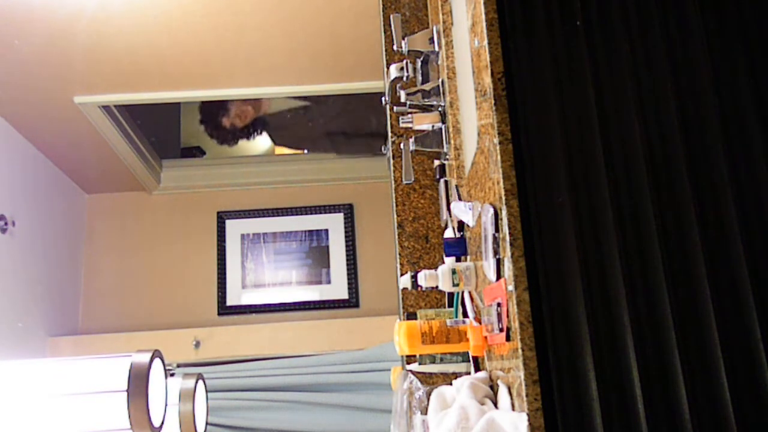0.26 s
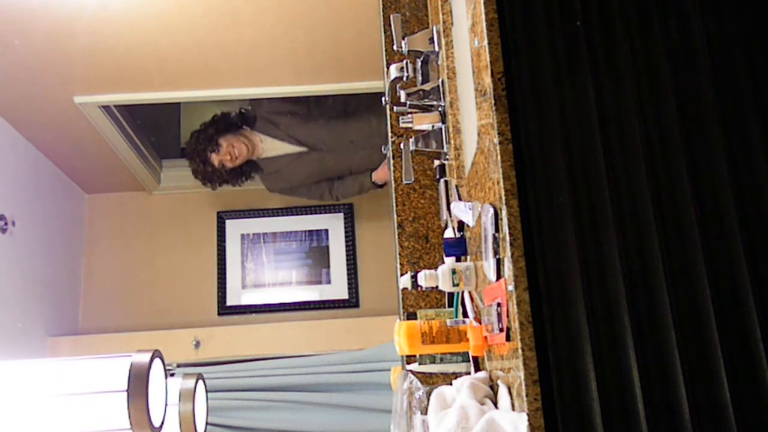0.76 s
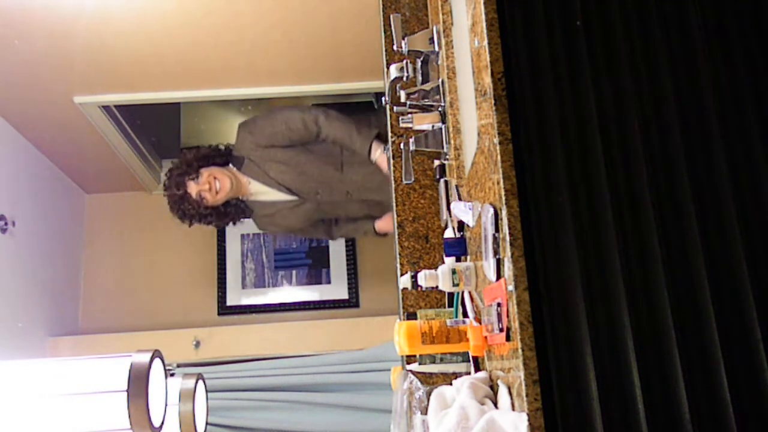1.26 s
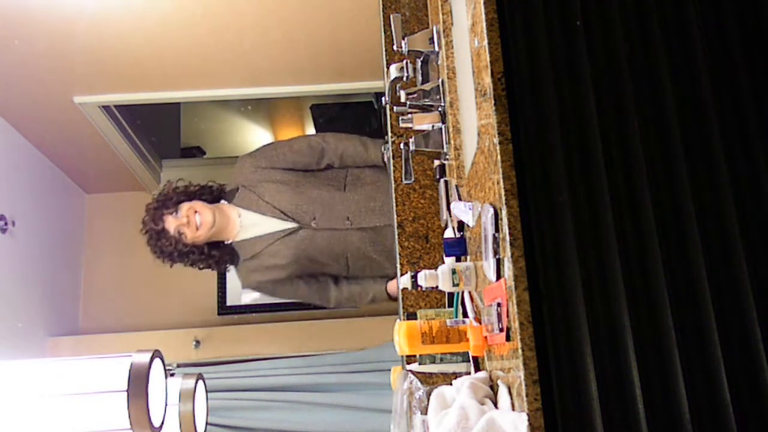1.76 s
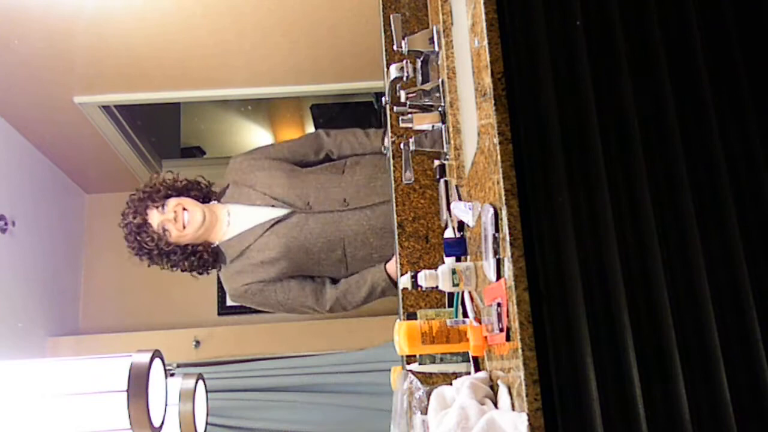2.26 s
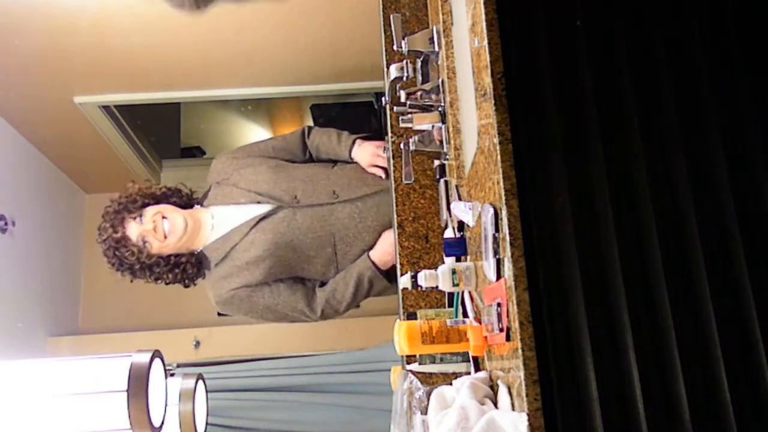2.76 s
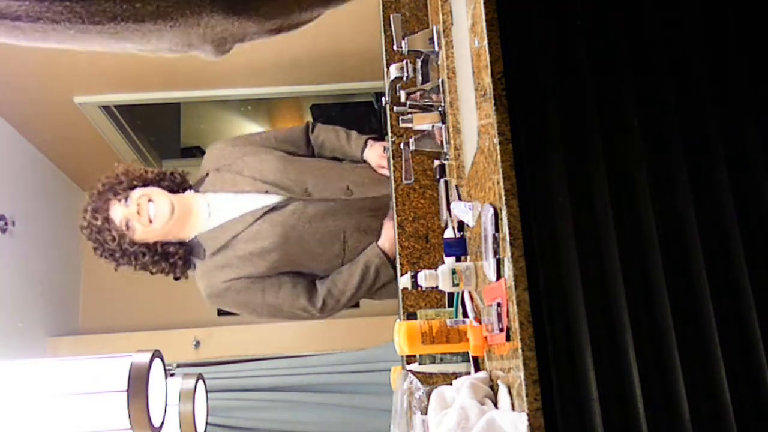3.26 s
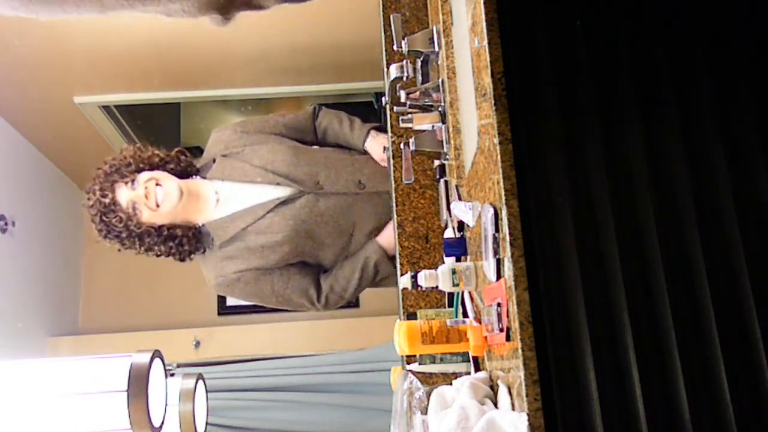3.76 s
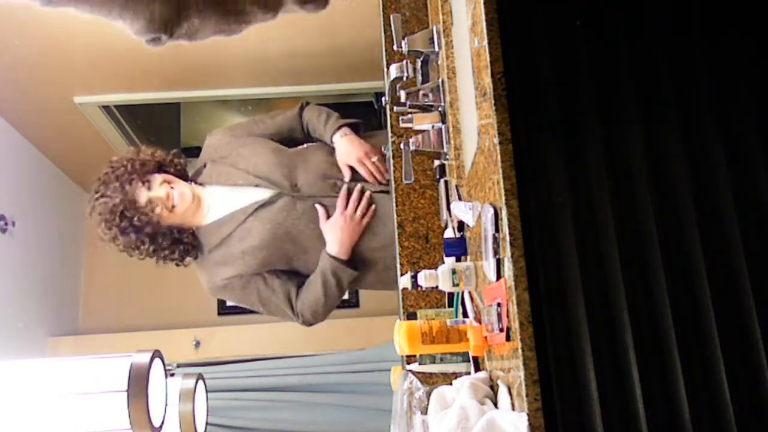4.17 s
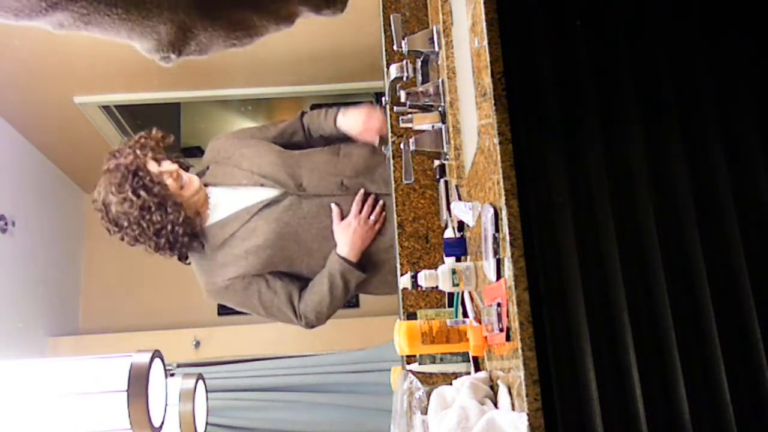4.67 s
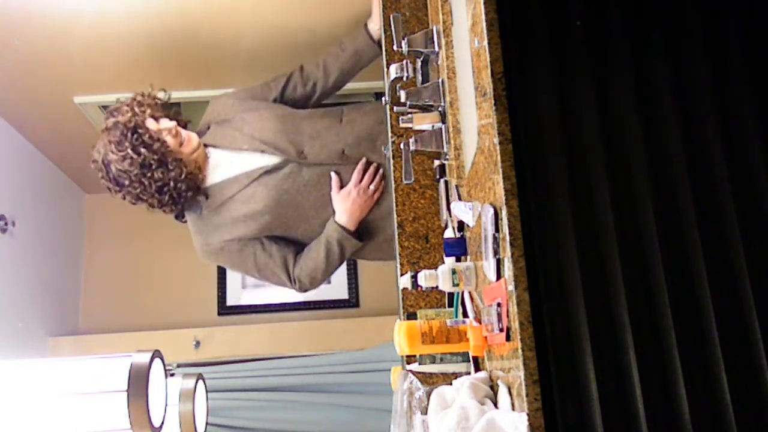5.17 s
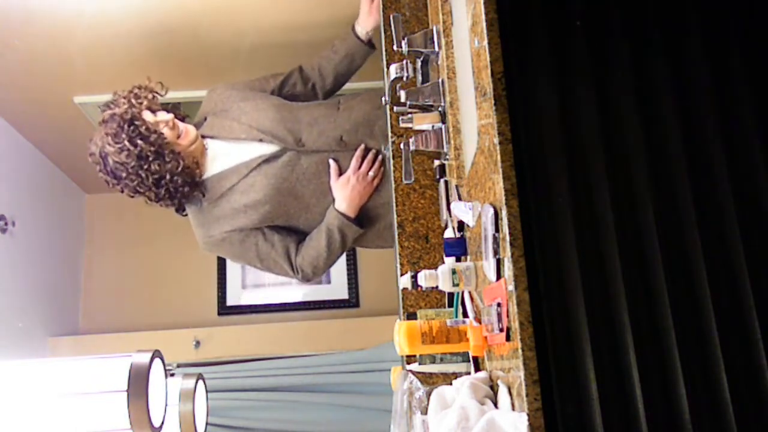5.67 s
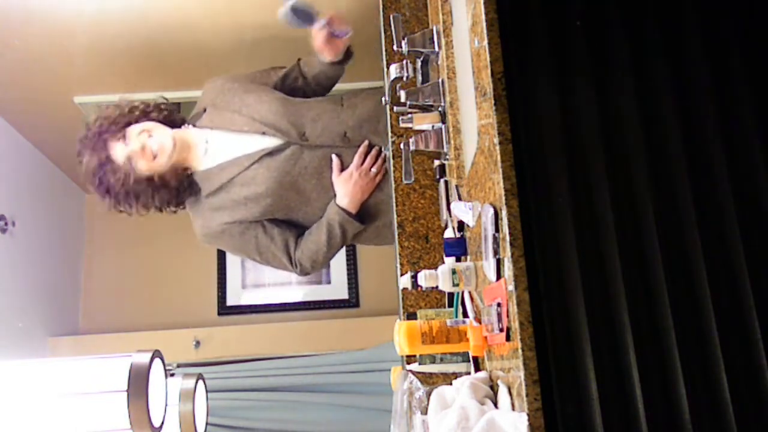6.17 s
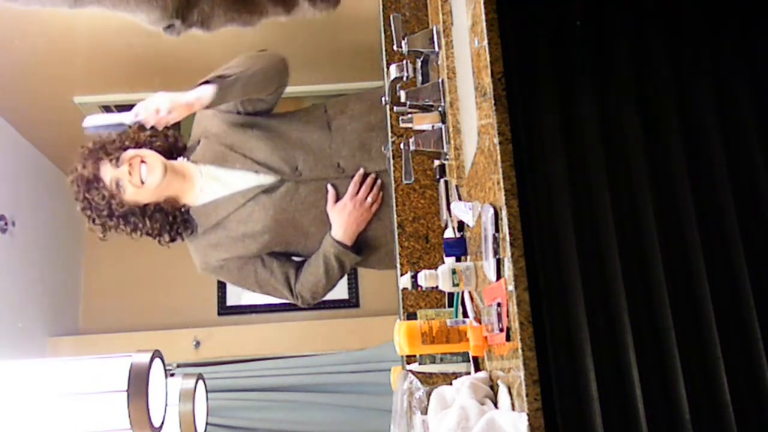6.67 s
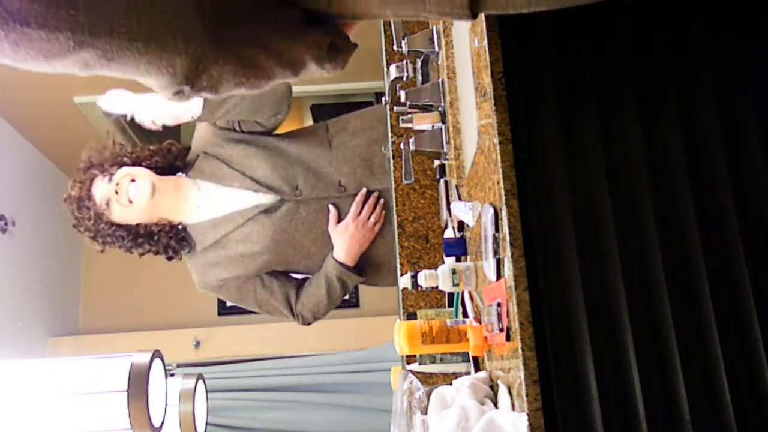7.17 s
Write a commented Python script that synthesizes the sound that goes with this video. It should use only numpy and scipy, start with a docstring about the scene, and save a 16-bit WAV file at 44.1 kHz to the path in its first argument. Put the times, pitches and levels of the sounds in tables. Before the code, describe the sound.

Six high-heel steps knock on hard bathroom tile, regular and hollow, the last two softer, with one tiny high squeak of a sole between the first two. A jacket swishes throughout with small dry snaps. After a quieter pause and one soft step, a plastic hairbrush clacks on the stone counter, then come ticks, rustle, a soft step and a faint shoe scuff. Short room echo, steady air noise, microphone on the counter.

```python
"""High heels knock on the tiles of a small bathroom: blows ring the tile, echoes and standing waves.
Six brisk steps, then a few slow ones. A sole squeaks once (stick-slip) and later scuffs (soft friction);
a hairbrush clacks on the counter (rattle and thud), a jacket rustles (shaped noise), small ticks and
snaps sound as ringing noise bursts. Steady ventilation noise and mains hum lie underneath."""
import sys
import numpy as np
from scipy import signal
from scipy.io import wavfile
from scipy.ndimage import uniform_filter1d

SR = 44100
rng = np.random.default_rng(int(sys.argv[2]) if len(sys.argv) > 2 else 0)


def master_out(mix):
    """Clip the mix to full scale and print it as 16-bit PCM to the path in sys.argv[1]."""
    frames = np.transpose(np.atleast_2d(mix))
    ceiling = np.clip(frames, -1, 1)
    pcm = np.round(ceiling * 32767).astype(np.int16)
    wavfile.write(sys.argv[1], SR, pcm)


def level_to_linear(level):
    """Convert decibel levels to linear amplitude factors, elementwise."""
    exponent = np.asarray(level, float) / 20
    return 10 ** exponent


N = 327663
PULSE_HZ = np.fft.rfftfreq(8192, 1 / SR)

# heel blows, the last three soft as weight shifts:
# (time [s], nominal peak [dB], brightness [dB per octave], tile ring [Hz], ring boost [dB])
STEPS = [(.2432, -8, 2.4, 567, 0), (.8785, -5, 0.6, 411, 6), (1.4716, -5.5, 2.5, 690, 1.5),
         (2.0642, -7, 0.1, 330, 5), (2.7065, -13.3, 2.0, 687, 2.5), (3.2515, -12, 3.5, 436, 3.5),
         (4.774, -15.5, -2.5, 357, 2), (6.469, -16.5, 0.1, 325, -1), (7.139, -36.5, 2, 1050, 15),
         (7.149, -37.5, -8, 480, 13), (7.168, -41, -0.5, 400, -2)]
# standing waves of the room: (frequency [Hz], relative level [dB], t60 [s])
ROOM_MODES = [(109, -9.5, 0.67), (160.4, -3.5, 0.41), (216, -4, 0.53), (267.2, -6, 0.48), (288.3, -6, 0.42),
              (341, -13, 0.15), (374.4, -2.5, 0.35), (427, -7, 0.34), (486, -4, 0.33), (533, -8.5, 0.44),
              (574, -4.5, 0.33), (664, -8, 0.25), (719, -9, 0.12)]


def read(points, hz):
    """Interpolates a spectrum table on a log-frequency axis."""
    f, value = np.transpose(points)
    return np.interp(np.log(hz + 1), np.log(f + 1), value)


def evened(x):
    """Scales to rms 1."""
    return x / np.sqrt(np.mean(x ** 2) + 1e-20)


def add(mix, start_s, sound):
    """Mixes a sound in at start_s."""
    part = mix[round(start_s * SR):][:len(sound)]
    part += sound[:len(part)]


def stroke(t, peak_s, db, rise_s, fall_s):
    """Level [dB] of a movement that swells to a peak and dies away; rise and fall in s per 10 dB."""
    return db - 10 * np.maximum((peak_s - t) / rise_s, (t - peak_s) / fall_s)


def pulse(colour_db):
    """Minimum-phase pulse: the shortest causal pulse of this colour."""
    log_gain = np.log(level_to_linear(np.maximum(colour_db, -100)))
    circle = np.concatenate([log_gain, log_gain[-2:0:-1]])
    spectrum = np.exp(np.conj(signal.hilbert(circle)))
    return np.fft.ifft(spectrum).real[:len(colour_db)]


def resonate(x, hz, width_hz):
    """Resonance of gain 1: shifts hz down to zero, smooths, shifts back."""
    turn = np.exp(2j * np.pi * np.cumsum(hz * np.ones(len(x))) / SR)
    r = np.exp(-np.pi * width_hz / SR)
    smooth = signal.lfilter([1 - r], [1, -r], x / turn)
    return 2 * (turn * smooth).real


def noise(field_db):
    """Noise from random short-time spectra; field_db(hz, t) shapes its level."""
    frames = N // 128 + 5
    hz = np.fft.rfftfreq(512, 1 / SR)[:, None]
    t = np.arange(frames) * 128 / SR
    a, b = rng.standard_normal((frames, 257, 2)).T
    spectra = (a + 1j * b) * level_to_linear(field_db(hz, t))
    return signal.istft(spectra, nperseg=512, noverlap=384)[1][:N]


def echoes(direct_db, swell_s=0.0023):
    """Direct sound plus dense reflections that gather quickly and die band by band; new at each call."""
    # decay of the room: (frequency [Hz], t60 [s])
    room_t60 = [(100, 0.35), (300, 0.56), (700, 0.39), (1500, 0.37), (4000, 0.33), (10000, .2)]
    taps = np.zeros(SR // 2)
    at = np.arange(60, len(taps) - 8, 8)
    taps[at + rng.integers(0, 8, len(at))] = rng.choice([-1., 1.], len(at))
    hz, t, z = signal.stft(taps, SR, nperseg=256)
    decay_db = -60 * t / read(room_t60, hz)[:, None]
    tail = signal.istft(z * level_to_linear(decay_db), SR, nperseg=256)[1][:len(taps)]
    tail *= 1 - np.exp(-np.arange(len(tail)) / SR / swell_s)
    tail /= np.linalg.norm(tail)
    tail[0] += level_to_linear(direct_db)
    return tail


def standing_waves(scatter_db=2.0):
    """Decaying low room modes; each spot on the floor stirs them with other strengths and signs."""
    hz, db, t60_s = np.transpose(ROOM_MODES)[:, :, None]
    t = np.arange(SR // 2) / SR
    chance, side = rng.standard_normal((len(hz), 2)).T[:, :, None]
    envelope = level_to_linear(db + scatter_db * chance - 60 * t / t60_s)
    ring = (np.sign(side) * envelope * np.sin(2 * np.pi * hz * t)).sum(0)
    return ring / np.linalg.norm(ring)


def heels(modes_db=-10.5, knock_hz=400, tile_octaves=0.28):
    """A short blow rings the tile under it, heard through echoes and standing waves."""
    # colour of a blow: (frequency [Hz], relative level [dB])
    heel_colour = [(35, -79), (60, -41.5), (130, -14.5), (216, -10), (277, -5), (407, 0), (753, -6.5),
                   (998, -14), (1090, -16.5), (1660, -33.5), (4000, -54), (5200, -60), (8800, -120)]
    # direct sound against the reflections: (time [s], level [dB])
    nearness = [(0, -13), (1.0, -7.5), (2.7, -3), (7.43, -5)]
    mix = np.zeros(N)
    octaves = np.log2((PULSE_HZ + 20) / knock_hz)
    for s, db, bright_db, tile_hz, tile_db in STEPS:
        # lift below the knock; harder blows land more on the tip and thump less
        thump_db = min(-.5 - .25 * db, 4.)
        tilt_db = bright_db * np.clip(octaves, 0, 3) - thump_db * np.clip(octaves, -1, 0)
        ring_db = tile_db * np.exp(-(np.log2((PULSE_HZ + 1) / tile_hz) / tile_octaves) ** 2)
        blow = pulse(read(heel_colour, PULSE_HZ) + tilt_db + ring_db)
        direct_db = np.interp(s, *np.transpose(nearness))
        room = echoes(direct_db) + level_to_linear(modes_db) * standing_waves()
        knock = signal.fftconvolve(blow, room)
        # rms of the first 50 ms set 9 dB under the nominal peak
        add(mix, s, level_to_linear(db - 9) * knock / np.std(knock[:SR // 20]))
    return mix


def scuff():
    """A shoe slides as weight shifts: soft friction through its body resonances."""
    # shoe body: (frequency [Hz], width [Hz], relative level [dB])
    shoe_modes = [(470, 130, 4.5), (1050, 320, -4.5), (246, 140, 2.5)]
    peak_s = 7.143
    t = peak_s + np.arange(-SR // 5, SR // 5) / SR
    rub = rng.standard_normal(len(t))
    body = evened(sum(level_to_linear(d) * resonate(resonate(rub, hz, w), hz, w) for hz, w, d in shoe_modes))
    mix = np.zeros(N)
    add(mix, t[0], level_to_linear(stroke(t, peak_s, db=-41, rise_s=.06, fall_s=.065)) * body)
    return mix


def squeak():
    """Uneven stick-slip in several patches of the sole: noise through resonances, in echoes."""
    # patches, the one loaded by weight first: (frequency [Hz], width [Hz], relative level [dB])
    sole_patches = [(4950, 420, -1), (6050, 900, -4), (7350, 600, -8), (8600, 500, -12), (6200, 2600, -2),
                    (4100, 900, -15.5), (10000, 2500, -15)]
    peak_s, loaded_peak_s = .682, .685
    t = peak_s + np.arange(-SR // 20, SR // 10) / SR
    patches = []
    for hz, width_hz, db in sole_patches:
        slip = rng.standard_normal(len(t))
        patches.append(level_to_linear(db) * evened(resonate(resonate(slip, hz, width_hz), hz, width_hz)))
    loaded, *others = patches
    rub = level_to_linear(stroke(t, loaded_peak_s, db=-29, rise_s=.0015, fall_s=.04)) * loaded
    rub += level_to_linear(stroke(t, peak_s, db=-25, rise_s=.009, fall_s=.019)) * sum(others)
    mix = np.zeros(N)
    add(mix, t[0], signal.fftconvolve(rub, echoes(-4.0)))
    return mix


def brush(modes_db=-4., thud_hz=700):
    """Hard plastic rattles on stone and rings briefly; the counter's low thud peaks just after."""
    # colour of the clack: (frequency [Hz], relative level [dB])
    clack_colour = [(47, -52), (90, -26), (155, -4), (500, -2), (728, -12.5), (948, -10), (1510, -13.5),
                    (1720, -19.5), (2450, -19.5), (2740, -23), (2990, -23), (7890, -31), (15600, -37)]
    # ringing: (frequency [Hz], width [Hz], relative level [dB])
    brush_modes = [(172, 22, 13), (1400, 180, -1), (2450, 200, -9), (3400, 250, -4), (950, 120, -11),
                   (4400, 300, -11)]
    touch_s, rest_s = 5.5085, 5.562
    t = np.arange(touch_s, rest_s, 1 / SR)
    grit = rng.standard_normal(len(t))
    low = signal.sosfilt(signal.butter(2, thud_hz, fs=SR, output="sos"), grit)
    chatter = level_to_linear(stroke(t, 5.515, db=-22, rise_s=.02, fall_s=.013)) * (grit - low)
    thud = level_to_linear(stroke(t, 5.522, db=-25, rise_s=.007, fall_s=.035)) * low
    rattle = np.append(chatter + thud, np.zeros(SR // 20))
    ring = sum(level_to_linear(d) * np.sqrt(SR / w) * resonate(rattle, hz, w) for hz, w, d in brush_modes) / 10
    clack = pulse(read(clack_colour, PULSE_HZ))
    body = signal.fftconvolve(rattle, clack / np.linalg.norm(clack))
    add(body, 0, level_to_linear(modes_db) * ring)
    mix = np.zeros(N)
    add(mix, touch_s, signal.fftconvolve(body, echoes(-1.5)))
    return mix


def rustle(flicker_db=1.0, split_hz=8000):
    """Hiss: the powers of fabric swishes and step hisses add up; the level flickers in all bands at once."""
    # colour of cloth: (frequency [Hz], relative level [dB])
    cloth_colour = [(600, 12), (1500, 2.5), (3000, 1.5), (5000, 4.5), (7500, 5), (11000, 4.5), (16000, -4)]
    # swishes of cloth and hair: (peak time [s], relative level [dB], rise [s per 10 dB],
    # fall [s per 10 dB], upper treble boost [dB])
    swishes = [(0.0, -55.5, 0.8, 0.756, -3), (0.319, -43.0, 0.01, 0.122, -3),
               (0.607, -50.0, 0.156, 0.091, -2), (0.778, -51.5, 0.021, 0.051, 3),
               (1.021, -50.0, 0.039, 0.044, -1), (1.288, -51.5, 0.478, 0.037, -1),
               (1.461, -51.0, 0.241, 0.017, -1), (1.632, -49.0, 0.031, 0.031, -3),
               (1.797, -49.0, 0.182, 0.157, -1), (2.019, -53.5, 0.068, 0.188, -1),
               (2.258, -48.5, 0.028, 0.256, 2), (2.504, -48.0, 0.188, 0.151, -3),
               (2.956, -47.5, 0.1, 0.1, 0), (3.201, -47.0, 0.03, 0.064, -3),
               (3.472, -55.5, 0.578, 0.139, -2), (3.632, -59.0, 0.041, 0.135, -2),
               (3.943, -55.0, 0.1, 0.299, -2), (4.525, -53.0, 0.186, 0.158, -1),
               (4.975, -60.5, 0.8, 0.465, -3), (5.473, -57.0, 0.055, 0.043, 5),
               (5.607, -53.0, 0.089, 0.136, -6), (5.682, -58, 0.006, 0.07, 11),
               (5.745, -62, 0.03, 0.03, 10), (5.806, -57.5, 0.034, 0.046, 7), (5.93, -55, 0.008, 0.09, -6),
               (5.975, -56, 0.04, 0.04, -3), (6.055, -48.0, 0.006, 0.044, -9),
               (6.232, -58.0, 0.223, 0.144, -3), (6.723, -51.0, 0.275, 0.323, -1),
               (7.118, -53.0, 0.12, 0.107, -1)]
    # each step brings a short hiss in proportion to its level; same columns
    step_hiss = [(s, db - 44, .004, .105, -4) for s, db, *_ in STEPS]

    def field_db(hz, t):
        flicker = evened(uniform_filter1d(rng.standard_normal(len(t)), size=3))
        upper = 1 / (1 + (split_hz / (hz + 1)) ** 8)
        power = sum(level_to_linear(2 * upper * upper_db) * level_to_linear(2 * stroke(t, *move))
                    for *move, upper_db in swishes + step_hiss)
        return read(cloth_colour, hz) + 10 * np.log10(power + 1e-20) + flicker_db * flicker

    return noise(field_db) / 10


def ticks():
    """Tiny snaps and ticks: decaying narrow noise; those close to the microphone are almost dry."""
    # dry snaps of fabric near the microphone: (time [s], peak [dB], frequency [Hz])
    near_snaps = [(2.1455, -39, 13000), (2.2115, -36, 12500), (2.335, -30, 10700), (2.367, -24.5, 11500)]
    # ticks of toe, buttons and bristles further off:
    # (time [s], peak [dB], frequency [Hz], width [Hz])
    far_ticks = [(0.3143, -36, 3030, 3000), (2.6631, -34.5, 1050, 2000), (5.466, -44, 9900, 500),
                 (5.6284, -39, 11500, 5000), (5.676, -33, 12100, 6000), (5.7978, -42, 11000, 5000),
                 (5.8896, -44, 12000, 5000), (6.054, -41, 6000, 5000)]
    # both gain: width [Hz] (snaps only), ring [s], room level [dB]
    events = [(*row, 5500, .0006, -18) for row in near_snaps]
    events += [(*row, .005, -1.5) for row in far_ticks]
    direct, far = np.zeros(N), np.zeros(N)
    t = np.arange(SR // 20) / SR
    for s, db, hz, width_hz, ring_s, room_db in events:
        grain = rng.standard_normal(len(t))
        snap = resonate(resonate(grain, hz, width_hz), hz, width_hz) * np.exp(-t / ring_s)
        snap *= level_to_linear(db) / abs(snap).max()
        add(direct, s, snap)
        add(far, s, level_to_linear(room_db) * snap)
    return direct + signal.oaconvolve(far, echoes(-40.))[:N]


def ventilation(level_db=-48.5, modes_db=-3.5):
    """Steady air noise; the room's modes stand out of it."""
    # colour of the air: (frequency [Hz], relative level [dB])
    vent_colour = [(12, -27), (20, -34), (64, -18.5), (85, -39), (107, -12.5), (162, -2.5), (275, -5),
                   (334, -7), (494, -8), (567, -11), (1020, -12.5), (1680, -18), (1930, -21.5), (7800, -26),
                   (15600, -27.5)]
    air = signal.oaconvolve(rng.standard_normal(N + SR), pulse(read(vent_colour, PULSE_HZ)))
    boom = sum(level_to_linear(db) * resonate(air, hz, 0.73 / t60_s + 10) for hz, db, t60_s in ROOM_MODES)
    both = evened(evened(air) + level_to_linear(modes_db) * evened(boom))
    return level_to_linear(level_db) * both[SR:SR + N]  # skips the filters' onset


def hum():
    """Two faint steady mains tones."""
    # mains hum: (frequency [Hz], rms level [dB])
    mains_tones = [(60, -74), (120, -63.5)]
    t = np.arange(N) / SR
    return sum(level_to_linear(db) * np.sqrt(2) * np.sin(2 * np.pi * (hz * t + rng.random())) for hz, db in mains_tones)


def scene():
    """Everything heard from the counter, one channel."""
    steps = heels() + scuff() + squeak()
    return (steps + brush() + rustle() + ticks() + ventilation() + hum())[None]


def top_cut(x):
    """Nothing passes above the cut-off."""
    return signal.sosfilt(signal.butter(12, 15800, fs=SR, output="sos"), x)


def record(dry):
    """The microphone port cancels one narrow band."""
    notch_hz, width_hz, depth_db = 7870, 780, -48
    heard = dry - (1 - level_to_linear(depth_db)) * resonate(dry[0], notch_hz, width_hz)
    return top_cut(heard)


dry = scene()
out = record(dry)
master_out(out)
```